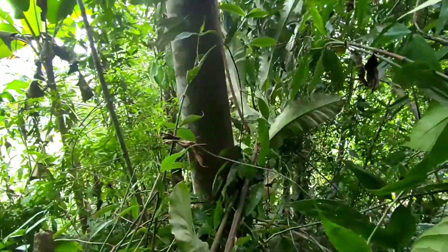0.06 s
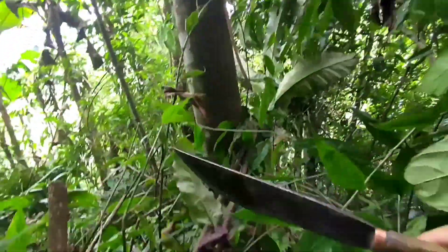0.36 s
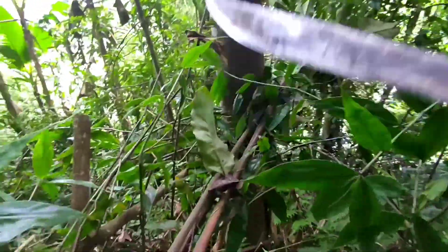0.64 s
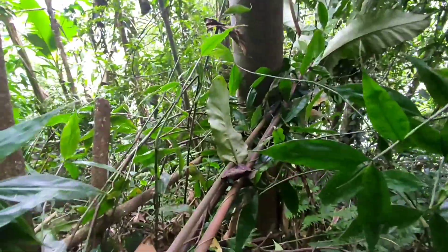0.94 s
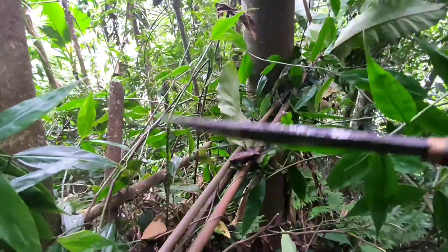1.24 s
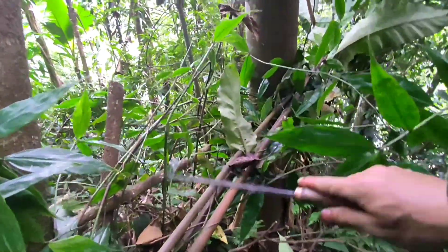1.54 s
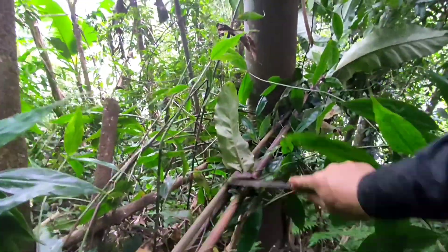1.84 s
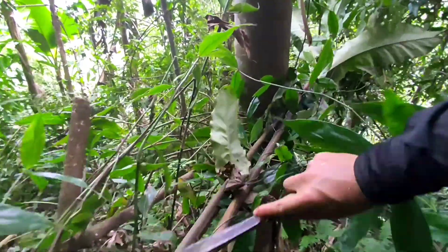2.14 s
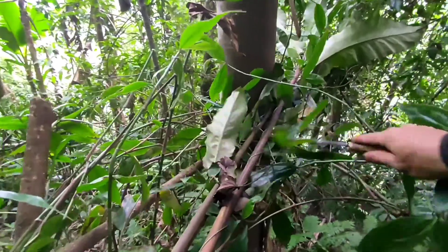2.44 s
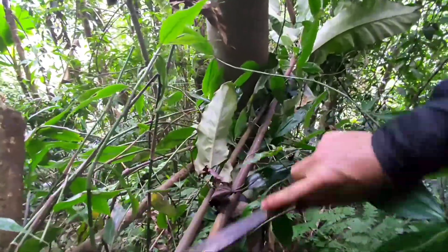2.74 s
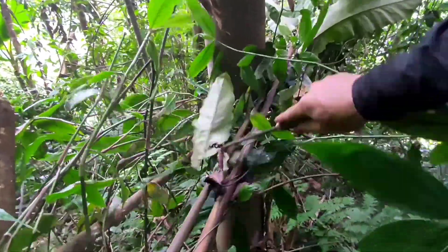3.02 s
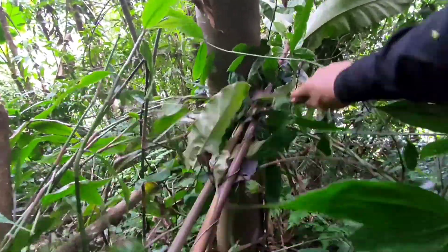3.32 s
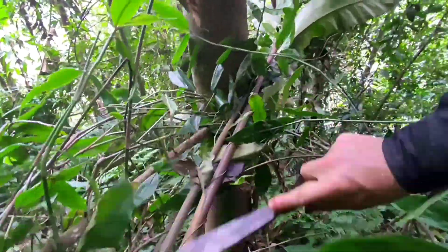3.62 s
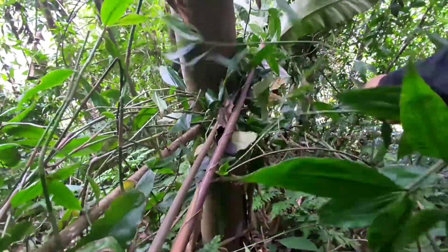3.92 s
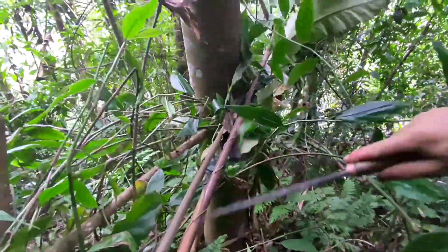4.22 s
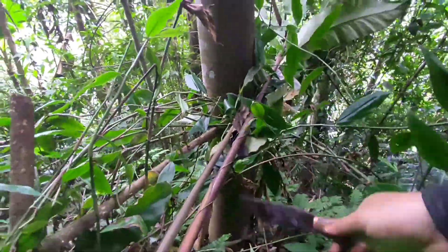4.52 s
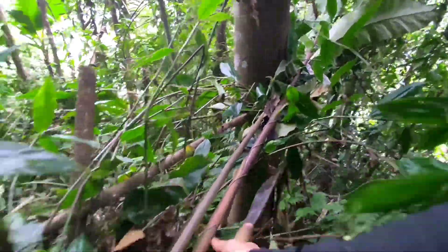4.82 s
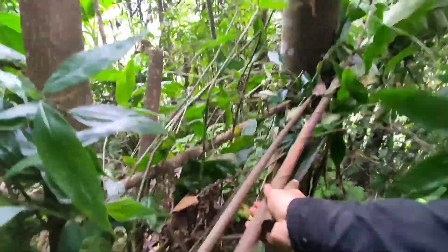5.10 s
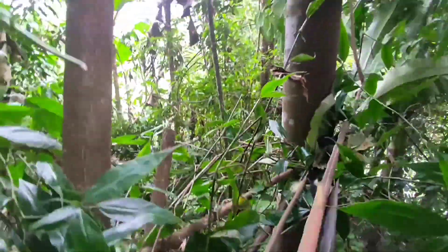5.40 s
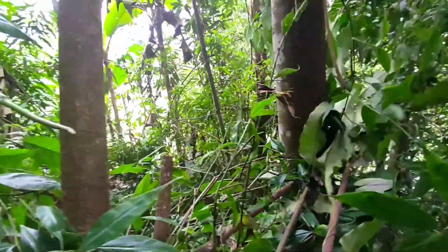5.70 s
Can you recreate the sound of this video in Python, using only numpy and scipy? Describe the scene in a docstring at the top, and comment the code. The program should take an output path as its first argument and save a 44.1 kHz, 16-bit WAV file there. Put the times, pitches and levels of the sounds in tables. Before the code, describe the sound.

Five quick machete strokes tear through vine stems near the microphone, about two a second, each a crisp crunch followed by rustling leaves, with woody knocks and twig snaps between. Before them come light rustling, a few faint bird chirps and a soft microphone bump. At the end the cut stems are pulled free over crackling leaf litter. Distant insects trill over a low forest hush.

```python
"""Leaves rustle and twigs snap, then a machete slashes five times through vine stems in a forest.
Each stroke is a rapid series of fibre fractures; struck wood knocks in its damped bending modes, and
the shaken foliage rustles on through countless small impacts. A hand then drags the cut stems through
the undergrowth, crushing dead leaves. One soft bump on the microphone comes before the first stroke.
Far off, a small bird chirps and insects trill over the hush of the trees."""
import sys
import numpy as np
from scipy import signal
from scipy.fft import rfft, irfft, next_fast_len
from scipy.io import wavfile

SR = 44100
rng = np.random.default_rng(int(sys.argv[2]) if len(sys.argv) > 2 else 0)


def inscribe(sig):
    """Save sig as 16-bit PCM at rate SR to the path in sys.argv[1].

    A 1-D sig is mono; a 2-D sig holds one channel per row.
    Samples are clipped to [-1, 1] before scaling.
    """
    pcm = np.round(np.clip(np.atleast_2d(sig).T, -1, 1) * 32767)
    wavfile.write(sys.argv[1], SR, pcm.astype(np.int16))


N = 253575
TIME = np.arange(N) / SR

# machete strokes: start_s, in_stem_s, level_db, tilt_db_per_octave, follow_through_drop_db, shake_db
MACHETE_STROKES = [(1.916, 0.06, -21.5, -2, 18, -39.5), (2.2885, 0.016, -12.5, -1.7, 13.5, -41),
                   (2.875, 0.028, -15.5, -1, 5.5, -39), (3.333, .02, -12.5, 1.5, 5.5, -36),
                   (3.8225, 0.034, -15.5, 0, 7.5, -36)]
# stems splitting in a short rip of fibres: start_s, length_s, level_db, tilt_db_per_octave
STEM_SPLITS = [(1.943, 0.0016, -12.5, -1.5), (1.962, 0.0075, -17, 0.5), (2.302, 0.002, -15.5, -4),
               (2.871, 0.002, -20.5, -1), (2.919, 0.009, -15.5, -2), (3.101, 0.0048, -33, -1),
               (3.131, .003, -21, 6.5), (3.1482, 0.0024, -13, 4.5), (3.158, .0035, -17.5, 1.5),
               (3.325, 0.006, -18, -3.5), (3.374, 0.0082, -17.5, -2.5)]
# twigs breaking: start_s, level_db, pitch_hz
TWIG_SNAPS = [(0.204, -41, 3880), (0.335, -33, 2930), (0.3679, -39.5, 3000), (2.0539, -29.5, 4830),
              (2.2625, -28.5, 3320), (2.587, -34.5, 3170), (2.638, -45, 5940), (2.7606, -41, 2100),
              (3.1963, -32.5, 2700), (3.62, -29, 6750), (3.642, -29, 6640), (3.7791, -27.5, 3860),
              (4.232, -30, 2560), (4.240, -41, 7200), (4.3744, -40.5, 2480), (5.102, -33.5, 1970),
              (5.1718, -34, 4300), (5.721, -29, 4900)]
# dull blows on wood: start_s, level_db
WOOD_KNOCKS = [(0.088, -35.5), (1.705, -44), (1.922, -27.5), (2.23, -25.5), (2.766, -33.5), (3.201, -25),
               (3.665, -18.5), (5.158, -32.5), (5.393, -28.5), (5.545, -28)]
# bending modes of a woody stem: pitch_hz, level_db, t60_s
WOOD_MODES = [(322.4, -7.5, 0.07), (407, -8, 0.018), (728, 2.5, 0.019), (795, -16, 0.057),
              (1037, 2, 0.0032), (1224, -4, 0.029), (2950, -10.5, 0.02)]

# movements that swell and fade: middle_s, half_length_s, level_db
LEAF_BRUSHES = [(.04, 0.22, -42.5), (.32, .05, -51), (.75, 0.087, -50), (1.36, 0.068, -52.5),
                (2.07, 0.022, -44), (2.5, 0.032, -46.5), (2.76, 0.098, -49.5), (3.04, 0.032, -35),
                (3.15, 0.042, -40.5), (3.63, 0.17, -40.5), (4.14, 0.11, -40), (4.66, 0.24, -45),
                (4.82, .025, -36.5), (4.96, 0.11, -39.5)]  # the arm or blade brushes past leaves
HAND_PULLS = [(5.195, 0.1, -37.5), (5.307, 0.039, -34.5), (5.545, 0.2, -32.5)]  # a hand pulls the cut stems out
BODY_HEAVES = [(.03, 0.19, -57), (4.06, 0.42, -51), (4.87, 0.19, -46.5), (5.23, 0.072, -43),
               (5.67, 0.15, -42)]  # the body and heavy stems shift
LITTER_CRUSHES = [(.02, 0.066, -44), (4.65, 0.044, -44), (5.25, 0.33, -47.5), (5.55, 0.097, -30.5),
                  (5.66, 0.12, -34.5)]  # dead leaves are crushed on the ground
# where the leaves move: time_s, left_minus_right_db
LEAF_PAN = [(0, 3.5), (1.2, -6), (1.7, -2.5), (2, -0.5), (3.9, 3), (4.4, -4.5), (4.9, -7), (5.16, 3.5),
            (5.75, -1.5)]
# soft bump on the microphone's housing: start_s, level_db
HOUSING_BUMPS = [(0.9725, -22.5)]
# a small bird's chirps: start_s, level_db
BIRD_CHIRPS = [(0.421, -52), (0.475, -50), (0.529, -50), (0.586, -46), (.644, -45)]
# bouts of an insect's trill: start_s, end_s, level_db
INSECT_TRILLS = [(0.43, .72, -53.5), (0.948, 1.82, -56), (2.4, 5.755, -55.5)]

# source spectra: frequency_hz, density_db
FIBRE_SPECTRUM = [(50, -15), (130, -6.5), (330, -1), (520, -8), (750, -0.5), (1700, -0.5), (2900, 5.5),
                  (5000, 2.5), (6500, 3), (8500, -1), (11000, -0.5), (12200, 4.5), (15500, 1)]  # breaking fibres
LEAF_SPECTRUM = [(150, -16), (400, -14), (900, -2.5), (1800, -1), (2900, 4), (4600, 1), (6600, 1.5),
                 (8800, -6.5), (15000, -17.5)]  # leaves brushing together
CRISP_SPECTRUM = [(3000, -11), (7000, 2.5), (11000, 2.5), (12500, 8.5), (14000, 2.5), (15500, -1)]  # the crisp top of the rustle
RUB_SPECTRUM = [(25, -13), (50, -20), (100, -3), (280, 2.5), (450, -4.5), (700, -14.5), (1500, -15.5)]  # heavy stems and the sleeve
LITTER_SPECTRUM = [(40, -16), (100, -20), (350, 5), (950, 5), (1500, 8), (2500, -2), (6000, -3.5),
                   (15000, -28)]  # crushed dead leaves
FOREST_SPECTRUM = [(30, -10), (120, 14.5), (300, 3), (800, 4), (1600, 7), (4500, -3.5), (7000, -26),
                   (15000, -76)]  # far leaves
# imbalance of the two microphone ports: frequency_hz, left_minus_right_db
PORT_BALANCE = [(60, -3.5), (1300, -2.5), (8000, -4.5), (10500, 5), (12500, 9.5), (15500, 0)]

STIR_DB = -55  # foliage motion at rest


def machete(follow_s=0.072):
    """Stems fracture under the blade, some splitting apart in short rips; it then sweeps on through leaves,
    slowing down."""
    out = np.zeros((2, N))
    for start, in_stem_s, db, tilt_db, drop_db, _ in MACHETE_STROKES:
        add(out, start, from_db(db) * tear(in_stem_s, tilt_db))
        follow_through = tear(follow_s, tilt_db=-1.5, fade_db_per_s=82)
        add(out, start + in_stem_s, from_db(db - drop_db) * follow_through)
    for start, length_s, db, tilt_db in STEM_SPLITS:
        add(out, start, from_db(db) * tear(length_s, tilt_db))
    return out


def tear(length_s, tilt_db, fade_db_per_s=0, rise_share=0.038, release_t60=0.034, level_db=-1.5):
    """Acoustic emission: fibres part by the thousand, in uneven bundles, exciting the stem's resonances."""
    t = TIME[:SR // 6]
    snaps = impulses(len(t), per_s=7000, spread_db=1.85, lag_s=.00005, jitter_s=.00005)
    bundles = from_db(2.5 * drift(308)[:len(t)])
    bite = np.minimum(t / (rise_share * length_s), 1)  # a longer slice bites in more gradually
    force = bite * from_db(-fade_db_per_s * t - 60 * np.maximum(t - length_s, 0) / release_t60)
    fibres = unit_rms(colour(snaps * bundles * force, FIBRE_SPECTRUM, tilt_db))
    fibres = highpass(fibres * np.sqrt(np.mean(force ** 2)), 110, order=1)
    return from_db(level_db) * reverberate(fibres, t60=0.033, wet_db=-3, low_hz=1380)


def twigs(crack_t60=0.03, ring_t60=0.016, ring_db=-4, level_db=1):
    """Brittle fracture: a dry burst of splinters, with the twig's own brief free vibration."""
    out, t = np.zeros((2, N)), TIME[:SR // 12]
    for start, db, hz in TWIG_SNAPS:
        splinters = impulses(len(t), per_s=9000, spread_db=5.0, lag_s=0, jitter_s=.00008)
        crack = colour(splinters * decay(t, crack_t60), FIBRE_SPECTRUM, tilt_db=-0.5)
        crack /= np.std(crack[:, :SR // 250])
        add(out, start, from_db(db + level_db) * (crack + from_db(ring_db) * ring(t, hz, ring_t60)))
    return out


def knocks(travel_s=0.00716, chatter_db=-4, chatter_t60=.05):
    """Dispersion: a chattering contact sends bending waves along the wood, and low modes arrive later."""
    out, t = np.zeros(N), TIME[:SR // 6]
    lowest_hz = WOOD_MODES[0][0]
    for start, db in WOOD_KNOCKS:
        wood = np.zeros(len(t))
        for hz, mode_db, t60 in WOOD_MODES:
            gain = from_db(mode_db + rng.normal(0, 0.95))
            detuned_hz = hz * (1 + rng.normal(0, 0.058))
            wood += gain * ring(t - travel_s * lowest_hz / hz, detuned_hz, t60)
        chatter = rng.standard_normal(len(t)) * decay(t, chatter_t60)
        contact = (t == 0) + from_db(chatter_db) * chatter / np.linalg.norm(chatter)
        add(out, start, from_db(db) * signal.fftconvolve(wood, contact))
    return highpass(out, 230, order=3)  # thin wood radiates almost no bass


def leaf_motion(rise_s=0.1, settle_db_per_s=44):
    """Incoherent powers add: a faint stir, brushes, pulls and each stroke's damped shake, summed in dB."""
    power = from_db(STIR_DB) ** 2 + swell_power(LEAF_BRUSHES) + swell_power(HAND_PULLS)
    for start, *_, shake_db in MACHETE_STROKES:
        age = np.maximum(TIME - start, 0)
        settling = from_db(shake_db - settle_db_per_s * np.maximum(age - rise_s, 0))
        power += (np.minimum(age / rise_s, 1) * settling) ** 2
    return 10 * np.log10(power)


def foliage(motion_db, leaf_db=-0.5, crisp_db=-6.5, brightening=0.28, clump_db=2.0, tick_db=-7):
    """Shot noise: leaves touch in clumps of tiny ticks; harder shaking gives a crisper top."""
    brush = unit_rms(impulses(N, per_s=12000, spread_db=1.5, lag_s=-0.000092, jitter_s=.0003))
    ticks = unit_rms(impulses(N, per_s=300, spread_db=0.2, lag_s=0, jitter_s=.0003))
    tick_shape = unit_rms(rng.standard_normal((2, 64))) / 8  # unit energy
    ticks = signal.fftconvolve(ticks, tick_shape, "same", axes=1)
    contacts = brush * from_db(clump_db * drift(90)) + from_db(tick_db) * ticks
    leaves = from_db(leaf_db) * unit_rms(colour(contacts, LEAF_SPECTRUM))
    crispness = from_db(crisp_db + brightening * (motion_db - STIR_DB))
    edges = crispness * unit_rms(colour(contacts, CRISP_SPECTRUM))
    pan_db = np.interp(TIME, *np.transpose(LEAF_PAN))
    return (leaves + edges) * from_db(motion_db) * pan(pan_db)


def stalks(motion_db, level_db=-5.0, count=36):
    """Impact excitation: thin stalks tap each other, each a damped resonator with its own pitch."""
    out = np.zeros((2, N))
    for hz in np.geomspace(280, 7000, count):
        taps_per_s = 800 / count * np.sqrt(hz / 1400)
        taps = impulses(N, taps_per_s, spread_db=2.5, lag_s=0, jitter_s=.0003)
        t60 = .5 / np.sqrt(hz)  # green, sappy stalks are heavily damped
        radius, angle = decay(1 / SR, t60), 2 * np.pi * hz / SR
        feedback = [1, -2 * radius * np.cos(angle), radius ** 2]
        out += signal.lfilter([0, np.sin(angle)], feedback, taps + 1e-18)
    return from_db(motion_db + level_db) * unit_rms(out)


def crackle(motion_db, level_db=-13, crack_t60=0.0072, growth=1.1, hard_shake_db=-32):
    """Buckling: dry leaves give way with tiny cracks, which stand out more as the foliage moves harder."""
    buckles = impulses(N, per_s=50, spread_db=1.2, lag_s=0, jitter_s=.0002)
    bursts = signal.fftconvolve(np.abs(buckles), decay(TIME[:SR // 50], crack_t60)[None], axes=1)[:, :N]
    cracks = unit_rms(colour(bursts * rng.standard_normal((2, N)), FIBRE_SPECTRUM))
    return cracks * from_db(level_db + hard_shake_db + growth * (motion_db - hard_shake_db))


def heavy_stems(motion_db, level_db=5.0, lumpy_db=2.5, rest_db=-60.5, growth=0.34):
    """Friction: heavy stems and the sleeve rub, low and lumpy, with the foliage and with each heave."""
    sway = from_db(rest_db + growth * (motion_db - STIR_DB))
    motion = np.sqrt(sway ** 2 + swell_power(BODY_HEAVES))
    rubs = impulses(N, per_s=2500, spread_db=2.5, lag_s=-0.00033, jitter_s=0.00059)
    return motion * from_db(level_db + lumpy_db * drift(23)) * unit_rms(colour(rubs, RUB_SPECTRUM))


def litter(clump_db=1.0):
    """Brittle crushing: dead leaves crack coarsely; the sound reaches the right port first."""
    cracks = impulses(N, per_s=4000, spread_db=2.5, lag_s=-0.00021, jitter_s=0.000083)
    crushing = np.sqrt(swell_power(LITTER_CRUSHES)) * from_db(clump_db * drift(60))
    return crushing * unit_rms(colour(cracks, LITTER_SPECTRUM))


def housing_bump(pitch_hz=240, t60=0.0086):
    """Heavy damping: the bumped microphone housing makes about one swing."""
    out = np.zeros(N)
    for start, db in HOUSING_BUMPS:
        add(out, start, from_db(db) * ring(TIME[:SR // 20], pitch_hz, t60))
    return highpass(out, 90, order=2)


def bird(top_hz=4550, bottom_hz=3950, length_s=0.0256, rasp_hz=150):
    """Frequency modulation: quick falling chirps with a random rasp, lightly smeared by the trees."""
    out, t = np.zeros((2, N)), TIME[:int(length_s * SR)]
    envelope = np.sin(np.pi * t / length_s)
    for start, db in BIRD_CHIRPS:
        hz = np.linspace(top_hz, bottom_hz, len(t)) + rasp_hz * drift(480)[:len(t)]
        add(out, start, from_db(db) * envelope * np.sin(2 * np.pi * np.cumsum(hz) / SR))
    return reverberate(out, t60=.3, wet_db=-5, low_hz=1000)


def insects(centre_hz=4380, width_hz=650, flutter_db=2, fade_s=0.03):
    """Amplitude modulation: a far trill, blurred to a narrow noise band, flutters in bouts."""
    bouts = sum(from_db(db) * np.clip(np.minimum(TIME - start, end - TIME) / fade_s, 0, 1)
                for start, end, db in INSECT_TRILLS)
    edges_hz = [centre_hz - width_hz / 2, centre_hz + width_hz / 2]
    band = signal.butter(4, edges_hz, "band", fs=SR, output="sos")
    trill = unit_rms(signal.sosfilt(band, rng.standard_normal((2, N))))
    return trill * bouts * from_db(flutter_db * drift(60))


def forest(level_db=-56.5, pan_db=-2):
    """Diffuse field: far leaves all around merge into an even hush, uncorrelated at the two ports."""
    hush = unit_rms(colour(rng.standard_normal((2, N)), FOREST_SPECTRUM))
    return hush * from_db(level_db) * pan(pan_db)


def impulses(n, per_s, spread_db, lag_s, jitter_s):
    """Poisson process: uneven clicks, each with a lag at the right port set by its own direction."""
    chance, size, sign = rng.random(n), rng.exponential(1, n), rng.choice([-1, 1], n)
    lag = np.round((lag_s + jitter_s * rng.standard_normal(n)) * SR).astype(int)
    left = np.flatnonzero(chance < per_s / SR)
    right = np.clip(left + lag[left], 0, n - 1)
    height = sign[left] * from_db(spread_db * np.minimum(size[left], 5))
    return np.array([np.bincount(arrivals, height, n) for arrivals in (left, right)])


def reverberate(x, t60, wet_db, low_hz):
    """Reverberation: dense reflections add a decaying noise tail, different at each port."""
    t = TIME[:SR // 2]
    tail = highpass(rng.standard_normal((2, len(t))) * decay(t, t60), low_hz, order=1)
    tail /= np.sqrt(np.sum(tail ** 2, axis=1, keepdims=True))
    return x + from_db(wet_db) * signal.fftconvolve(x, tail, axes=1)[:, :x.shape[1]]


def colour(x, spectrum, tilt_db=0):
    """Minimum-phase filter; above 500 Hz the spectrum tilts by tilt_db per octave, pivoting at 4 kHz."""
    n = x.shape[-1]
    size = 2 * next_fast_len(n // 2 + 2048)
    octave = np.log2(np.maximum(np.arange(size // 2 + 1) * SR / size, 10))
    hz, db = np.transpose(spectrum)
    slope_db = tilt_db * (np.maximum(octave, np.log2(500)) - np.log2(4000))
    gain = from_db(np.interp(octave, np.log2(hz), db) + slope_db)
    cepstrum = irfft(np.log(gain))[:size // 2]
    cepstrum[1:] *= 2  # folding onto positive time makes the filter causal
    return irfft(rfft(x, size) * np.exp(rfft(cepstrum, size)))[..., :n]


def swell_power(movements):
    """Power summation of movements that each rise and fall as a bell curve."""
    return sum((from_db(db) * np.exp(-((TIME - middle) / half) ** 2)) ** 2
               for middle, half, db in movements)


def ring(t, hz, t60):
    """Damped oscillation of a struck mode, silent before t = 0."""
    t = np.maximum(t, 0)
    return np.sin(2 * np.pi * hz * t) * decay(t, t60)


def decay(t, t60):
    """Exponential decay by 60 dB in t60 seconds."""
    return from_db(-60 * t / t60)


def drift(rate_hz):
    """Random fluctuation: straight lines between knots of unit power."""
    knots = rng.standard_normal(int(N / SR * rate_hz) + 2)
    return np.interp(TIME * rate_hz, np.arange(len(knots)), unit_rms(knots))


def highpass(x, hz, order):
    """Maximally flat bass roll-off."""
    return signal.sosfilt(signal.butter(order, hz, "high", fs=SR, output="sos"), x)


def pan(left_minus_right_db):
    """Level difference as a pair of gains."""
    return from_db(np.array([[.5], [-.5]]) * left_minus_right_db)


def add(out, start_s, sound):
    """Superposition: mix a sound in at start_s."""
    at = max(round(start_s * SR), 0)
    out[..., at:at + sound.shape[-1]] += sound[..., :N - at]


def from_db(db):
    """Decibels to amplitude ratio."""
    return 10 ** (np.asarray(db) / 20)


def unit_rms(x):
    """Normalisation to unit power."""
    return x / np.sqrt(np.mean(x ** 2) + 1e-20)


def scene():
    """Superposition: close blows echo off trunks and leaves; one motion drives leaves, stalks and stems."""
    blows = reverberate(machete() + twigs() + knocks(), t60=0.24, wet_db=-10.0, low_hz=250)
    motion_db = leaf_motion()
    undergrowth = foliage(motion_db) + stalks(motion_db) + crackle(motion_db) + heavy_stems(motion_db)
    return blows + undergrowth + litter() + housing_bump() + forest() + bird() + insects()


def record(dry, low_hz=58, high_hz=15500):
    """Frequency response: each microphone port has its own colour; deep bass and the top are cut."""
    left = colour(dry[0], [(hz, db / 2) for hz, db in PORT_BALANCE])
    right = colour(dry[1], [(hz, -db / 2) for hz, db in PORT_BALANCE])
    ports = highpass([left, right], low_hz, order=2)
    return signal.sosfilt(signal.ellip(10, .3, 75, high_hz, fs=SR, output="sos"), ports)


dry = scene()
out = record(dry)
inscribe(out)
```